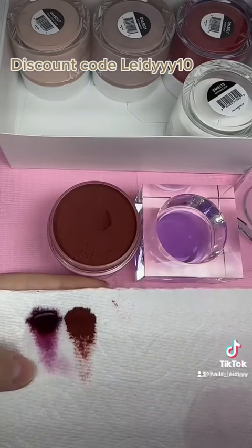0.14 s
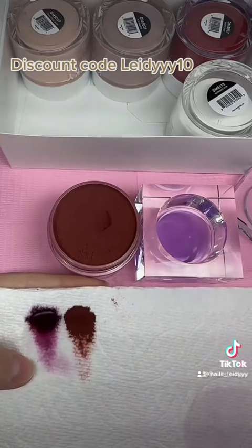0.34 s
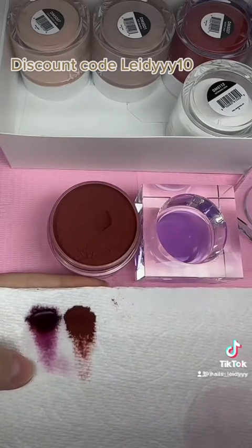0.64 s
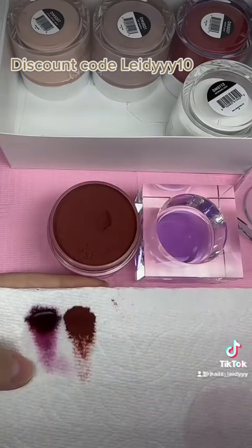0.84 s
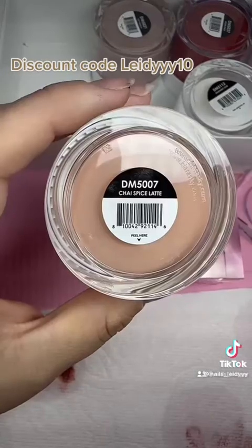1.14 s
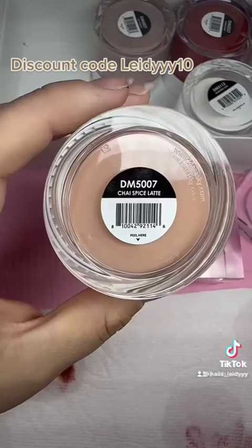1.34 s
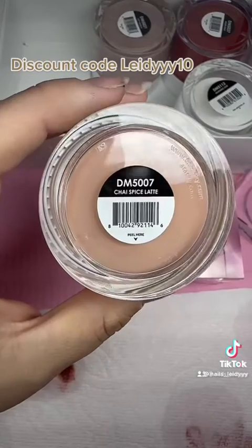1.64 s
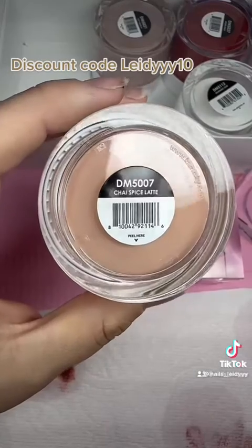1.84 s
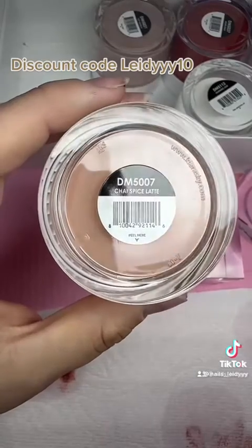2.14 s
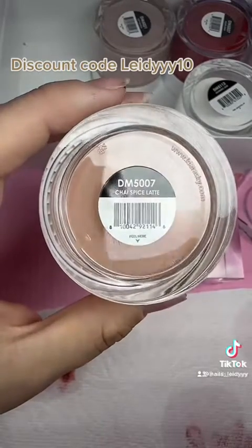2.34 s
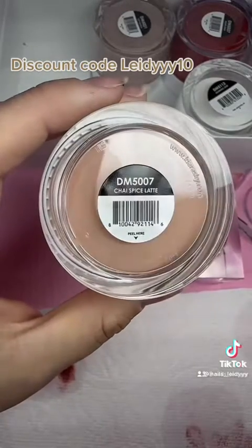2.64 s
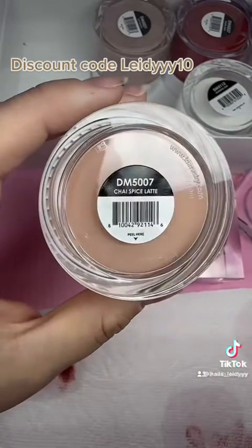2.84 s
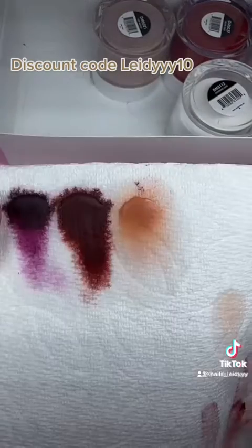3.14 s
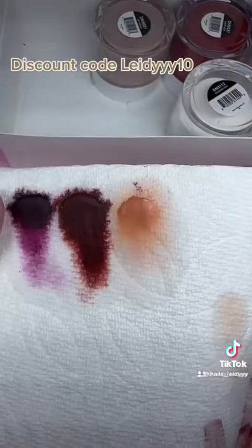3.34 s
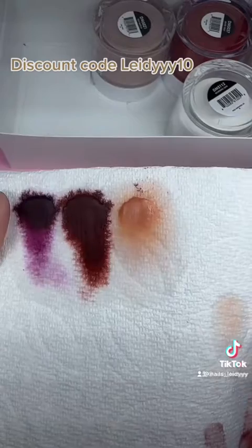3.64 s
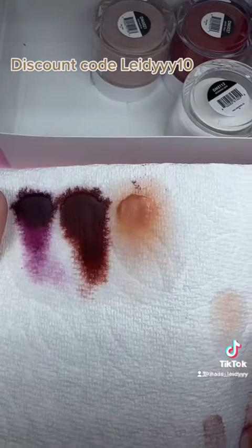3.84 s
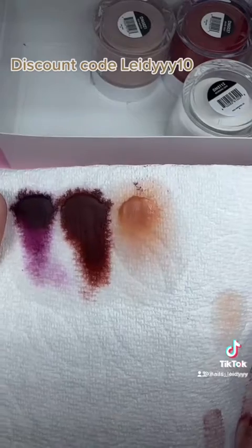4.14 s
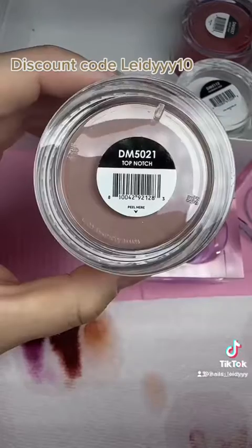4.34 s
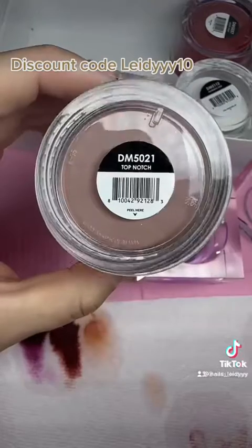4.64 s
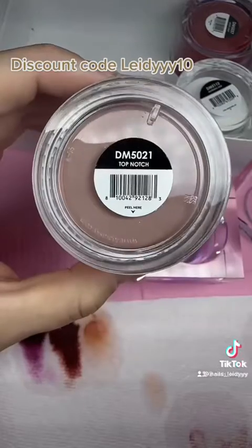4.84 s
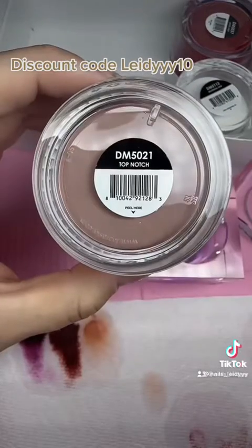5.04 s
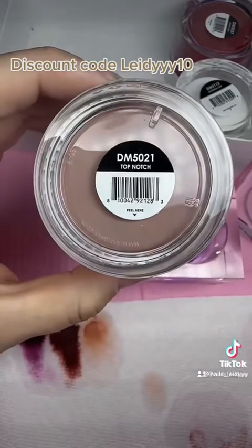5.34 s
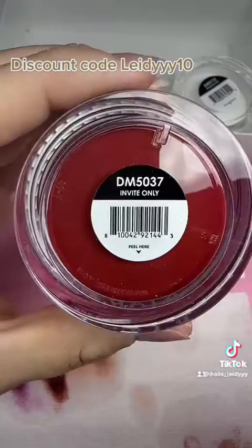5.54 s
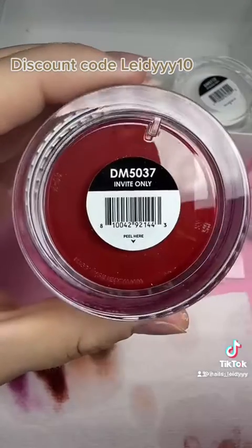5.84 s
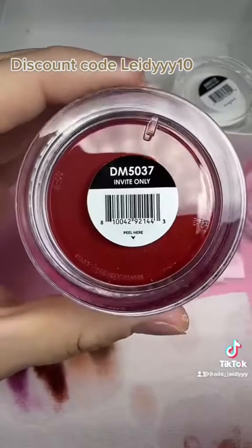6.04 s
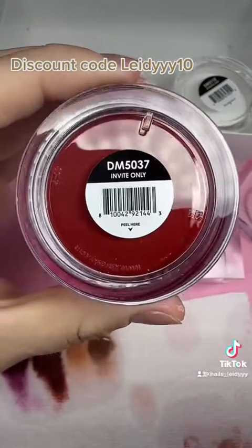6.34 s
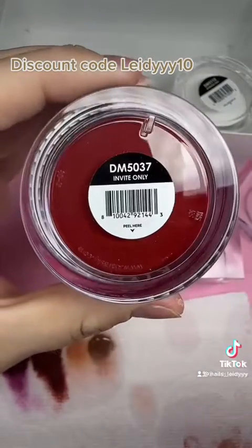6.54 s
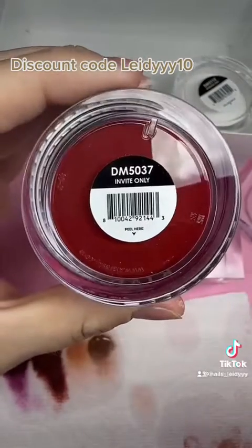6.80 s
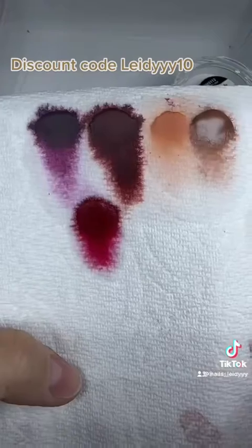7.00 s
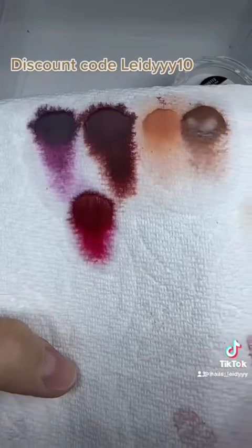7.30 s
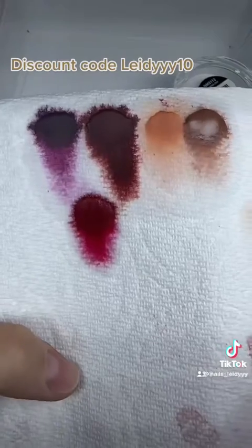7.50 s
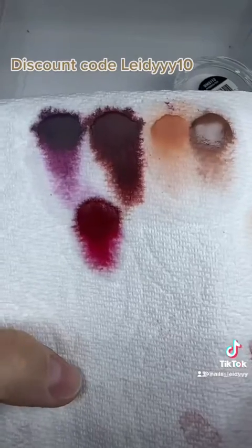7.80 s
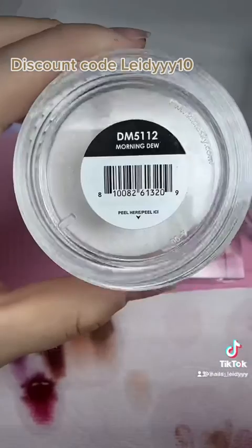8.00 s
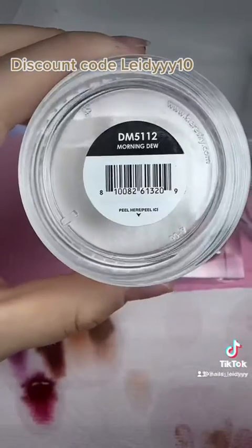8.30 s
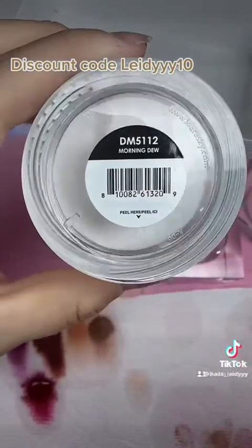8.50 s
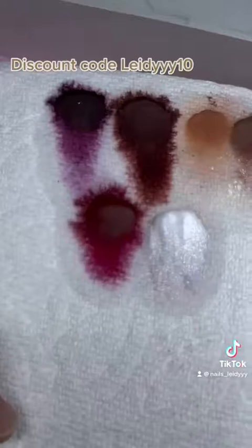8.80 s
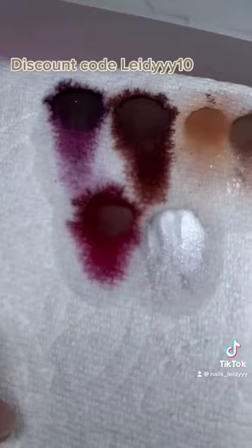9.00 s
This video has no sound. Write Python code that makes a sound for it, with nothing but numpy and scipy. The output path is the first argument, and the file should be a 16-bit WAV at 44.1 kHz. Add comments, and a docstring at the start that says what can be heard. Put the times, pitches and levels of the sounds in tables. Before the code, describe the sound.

From the start a fan drones in a small room: steady low hum, a fluttering low-pitched drone, a throbbing rush of air, barely audible thin whines and a faint high hiss. Very soft, high finger brushes occur at 0.16, 0.4 and 0.8 seconds. At 0.9 the sound drops abruptly to near silence, returning at 1.05. Similar short gaps follow at 2.95, 4.14, 5.5, 6.8 and 7.82, each about 0.15 seconds, with the drone's strength changing slightly after each. A tiny dry nail tick sounds at 3.4; faint swishes come near 4.0, 4.65 and 7.3. The returns at 6.94 and 7.97 have small clicks; the drone is weakest between them. After a shorter gap at 8.52, the fan resumes at 8.58 boomier, duller and spread wide, with a slight brush at 9.1, and cuts off around 9.16.

```python
"""From the start a fan runs in a small room: its motor hums at twice the mains frequency, its rotor drones
on multiples of the shaft speed, and its air rushes through resonances, under a faint hiss above 13 kHz.
Band-limited noise gives fingers brushing paper or plastic from 0.16 s; decaying modes tick once at 3.4 s.
Eight shots are joined by hard, nearly silent cuts, with fan level and drone set for each; two returns,
near 6.9 and 8.0 s, click. The last shot, from 8.6 s, is boomier, duller and spreads into stereo."""
import sys
import numpy as np
from scipy import signal
from scipy.fft import rfft, irfft, next_fast_len
from scipy.io import wavfile

SR = 44100
rng = np.random.default_rng(int(sys.argv[2]) if len(sys.argv) > 2 else 0)


def wav_record(signal):
    """Record a signal, one row per channel, as 16-bit PCM in the file named by sys.argv[1]."""
    frames = np.transpose(np.atleast_2d(signal))
    bounded = np.clip(frames, -1, 1)
    # unit amplitude maps onto the largest positive 16-bit level
    quanta = np.round(bounded * 32767).astype(np.int16)
    wavfile.write(sys.argv[1], SR, quanta)


N = 403956  # length [samples]
MAINS_HZ, SHAFT_HZ = 60, 36.85  # mains frequency, mean turns per second
HUM_DB = -35.5  # motor hum before the fan level of each shot
TICK_S = 3.379  # onset of the tick
TOP_HZ = 15750  # upper band limit

# Shots, with the fan's gain and its drones before that gain:
# (start [s], end [s], fan gain [dB], lower drone [dB], upper drone [dB])
SHOT_TABLE = [(0.0, 0.8955, 3.5, -44, -37.5), (1.0503, 2.95, -0.2, -48, -43.5),
              (3.0936, 4.141, 0, -47, -38), (4.2871, 5.5048, 0.17, -42, -38.5),
              (5.65, 6.803, -0.5, -45, -40), (6.939, 7.819, -0.5, -51, -54.5),
              (7.966, 8.5163, -0.46, -41, -43.5), (8.583, 9.16, -0.5, -43.5, -45.5)]
# Spectral density of the steady noise before resonance, with a faint hiss shelf above 13 kHz:
# (frequency [Hz], density [dB per Hz])
NOISE_SPECTRUM = [(20, -93), (45, -77.5), (130, -69), (265, -72), (400, -71), (650, -76.5), (1050, -80.5),
                  (1500, -82), (2000, -88.5), (3400, -94), (5000, -96.5), (9500, -108.3), (12500, -116.5),
                  (13300, -107.5)]
# Resonances of housing and room: (centre [Hz], width at half the lift [Hz], lift [dB])
ROOM_RESONANCES = [(56.8, 9, 14), (170, 13, 2), (219.4, 25, 6.5), (298.1, 16, 8), (345.2, 65, 12.5),
                   (462.3, 32, 8.5), (537.4, 24.4, 10.5), (594, 37, 6), (780, 87, 5.5), (950, 19, 8),
                   (1138, 38, 8), (1301, 150, 3.5), (1638, 47, 4.5), (2560, 468, 2), (4148, 386, 0.5)]
# Fluttering blade drones, lower and upper: multiple of the shaft speed [1]
BLADE_ORDERS = [8, 9]
# Rotor unbalance lines before the fan gain: (multiple of the shaft speed [1], level [dB])
UNBALANCE_LINES = [(1, -60.5), (2, -47.5)]
# Thin motor whines before the fan gain: (mean frequency [Hz], median level [dB])
MOTOR_WHINES = [(766.6, -67), (941.5, -71), (1356.6, -62.5), (2182.5, -79.5), (2241, -70), (2477, -74.5),
                (2654, -73.5), (4131, -73)]
# Fingers on paper or plastic: (middle [s], length at half height [s], centre [Hz], level before grain [dB])
FINGER_BRUSHES = [(.16, 0.17, 11500, -64.5), (.385, 0.06, 14800, -67), (.805, 0.027, 14200, -66),
                  (3.988, .035, 1950, -54), (4.66, .13, 2150, -56), (7.283, .025, 14500, -62.5),
                  (9.087, .06, 2410, -57)]
# Modes of one tick, as of a nail on plastic, before the contact rise:
# (frequency [Hz], starting level [dB], 60 dB decay time [s])
NAIL_MODES = [(3240, -37.5, 0.031), (3500, -41, .008), (4090, -36, .01), (4630, -34, 0.0086),
              (5050, -41, .008), (13900, -44, .008)]
# Clicks as the sound returns: (time [s], peak level [dB])
SPLICE_CLICKS = [(6.9413, -28.5), (7.967, -26.5)]
# Spectral colour of the whole fan in the last shot: (frequency [Hz], gain [dB])
LAST_SHOT_COLOUR = [(130, 4.5), (330, 1.3), (700, 0.5), (1400, -3), (6000, 2), (12500, -8.5)]
# Filter for the diffuse noise at the sides of the last shot: (frequency [Hz], gain [dB])
SIDE_NOISE = [(200, -50), (360, -17), (700, -7), (1350, -6), (1750, -17), (2300, -44)]


def undb(db):
    """Logarithmic level: 20 dB is a factor of ten in amplitude."""
    return 10 ** (np.asarray(db) / 20)


def walk(rate):
    """Low-passed Gaussian noise: a slow chance of spread 1, changing about rate times a second."""
    size = next_fast_len(N, real=True)
    hz = np.arange(size // 2 + 1) * SR / size
    spectrum = rfft(rng.standard_normal(size))
    slow = irfft(spectrum * np.exp(-.5 * (hz / rate) ** 2), size)[:N]
    return slow / slow.std()


def shape(x, response):
    """Linear filtering: the spectrum of x is multiplied by the gain response(Hz)."""
    size = next_fast_len(N, real=True)
    hz = np.maximum(np.arange(size // 2 + 1) * SR / size, 1)
    return irfft(rfft(x, size) * response(hz), size)[:N]


def bump(x, centre, width):
    """Gaussian bell of height 1, width wide at half height."""
    return .5 ** ((2 * (x - centre) / width) ** 2)


def colour(points):
    """Spectral envelope: the gain through (Hz, dB) points, interpolated over log frequency."""
    at_hz, db = np.transpose(points)
    return lambda hz: undb(np.interp(np.log(hz), np.log(at_hz), db))


def tone(hz):
    """Phase is the integral of frequency: a sine of rms 1 follows the pitch curve."""
    cycles = np.cumsum(hz) / SR + rng.random()
    return np.sqrt(2) * np.sin(2 * np.pi * cycles)


def per_shot():
    """Piecewise constant levels: each shot's fan and drone settings change in mid gap."""
    start, end, *columns = np.transpose(SHOT_TABLE)
    cuts = (end[:-1] + start[1:]) / 2
    shot = np.searchsorted(cuts, np.arange(N) / SR)
    return np.array(columns)[:, shot]


def motor(hum_db, waver_db=-0.06, whine_drift=.0004):
    """Magnetic attraction pulls the iron twice a mains cycle; thin whines sit far above the hum."""
    hum = undb(hum_db + waver_db * walk(3)) * tone(np.full(N, 2. * MAINS_HZ))
    speed = 1 + whine_drift * walk(1.27)  # shared by all whines
    whines = 0
    for hz, db in MOTOR_WHINES:
        whines = whines + undb(db + 2 * walk(2.8)) * tone(hz * speed)
    return hum + whines


def rotor(drone_dbs, shaft_hz, flutter=0.23, flutter_hz=5):
    """Periodic forcing: unbalance gives steady low lines; blades in uneven air give fluttering drones."""
    out = sum(undb(db) * tone(round(order) * shaft_hz) for order, db in UNBALANCE_LINES)
    for order, db in zip(BLADE_ORDERS, drone_dbs):
        # a complex factor disturbs both amplitude and phase
        eddies = flutter * (walk(flutter_hz) + 1j * walk(flutter_hz))
        cycles = order * np.cumsum(shaft_hz) / SR + rng.random()
        blades = np.real((1 + eddies) * np.exp(2j * np.pi * cycles))
        out = out + undb(db) * blades / blades.std()
    return out


def noise_colour(hz):
    """Resonance: the spectrum of the steady noise is lifted at each mode of housing and room."""
    lifts_db = sum(lift * bump(hz, centre, width) for centre, width, lift in ROOM_RESONANCES)
    return colour(NOISE_SPECTRUM)(hz) * undb(lifts_db)


def airflow(shaft_hz, swell_db=0.56, throb=0.17, throb_below_hz=800):
    """Amplitude modulation: rushing air, with a faint top hiss, throbs once a turn in its low eddies."""
    white = rng.standard_normal(N) * np.sqrt(SR / 2)  # density 0 dB per Hz
    rush = shape(white, noise_colour)
    eddies = shape(rush, lambda hz: 1 / (1 + hz / throb_below_hz))
    throbbing = throb * tone(shaft_hz) * eddies
    return (rush + throbbing) * undb(swell_db * walk(7))


def fingers(grain_db=3.0, octaves=0.92):
    """Sliding friction: skin slips over paper or plastic in soft, grainy swishes, each in its own band."""
    t = np.arange(N) / SR
    out = 0
    for middle, length, centre_hz, db in FINGER_BRUSHES:
        band = lambda hz: bump(np.log2(hz / centre_hz), 0, octaves)
        swish = shape(rng.standard_normal(N), band)
        out = out + undb(db) * bump(t, middle, length) * swish / swish.std()
    return out * undb(grain_db * walk(150))


def tick(contact_s=0.00034):
    """Modal decay: a light contact builds up over a moment and rings a few short modes."""
    age = np.maximum(np.arange(N) / SR - TICK_S, 0)
    ring = 0
    for hz, db, t60 in NAIL_MODES:
        mode = np.sin(2 * np.pi * (hz * age + rng.random()))
        ring = ring + undb(db - 60 * age / t60) * mode
    return ring * (1 - np.exp(-(age / contact_s) ** 2))


def splices(relax_s=0.00035):
    """Step with exponential relaxation: a sudden jump that dies at once is a faint click."""
    t = np.arange(N) / SR
    return sum(undb(db) * (t >= s) * np.exp(-np.abs(t - s) / relax_s) for s, db in SPLICE_CLICKS)


def last_shot(fan, shaft_hz):
    """Diffuse field: the recoloured fan gains noise of opposite sign at the two ears, mainly in the midrange."""
    diffuse = shape(airflow(shaft_hz), colour(SIDE_NOISE))
    mid = shape(fan, colour(LAST_SHOT_COLOUR))
    side = shape(diffuse, colour(LAST_SHOT_COLOUR))
    return np.array([mid + side, mid - side])


def scene(speed_drift=0.0006):
    """Superposition: fan, fingers and tick add in the middle; in the last shot the fan opens to the sides."""
    fan_db, *drone_dbs = per_shot()
    shaft_hz = SHAFT_HZ * (1 + speed_drift * walk(0.84))
    fan = undb(fan_db) * (motor(HUM_DB) + rotor(drone_dbs, shaft_hz) + airflow(shaft_hz))
    in_last_shot = np.arange(N) / SR >= SHOT_TABLE[-1][0]
    return np.where(in_last_shot, last_shot(fan, shaft_hz), fan) + fingers() + tick()


def shot_gain(start, end, first_db=-1.58, settled_db=0.66, settle_s=0.95, close_s=0.0018,
              tail_db=-29, tail_s=0.038):
    """Exponential approach: a shot starts at once, a little low, creeps up, then drops to a fading trace."""
    t = np.arange(N) / SR
    creep_db = settled_db + (first_db - settled_db) * np.exp(-np.maximum(t - start, 0) / settle_s)
    closing = np.clip((end - t) / close_s + .5, 0, 1)
    trace = undb(tail_db) * np.clip(1 - (t - end) / tail_s, 0, 1)
    return (t >= start) * undb(creep_db) * np.maximum(closing, trace)


def record(dry, mute_db=-66):
    """Gating and band limiting: the sound is muted between shots, and a steep low-pass cuts the top."""
    gain = undb(mute_db) + sum(shot_gain(start, end) for start, end, *_ in SHOT_TABLE)
    edited = dry * gain + splices()
    low_pass = signal.ellip(10, .1, 80, TOP_HZ, fs=SR, output="sos")  # ripple .1 dB, stop band 80 dB down
    return signal.sosfilt(low_pass, edited)


dry = scene()
out = record(dry)
wav_record(out)
```